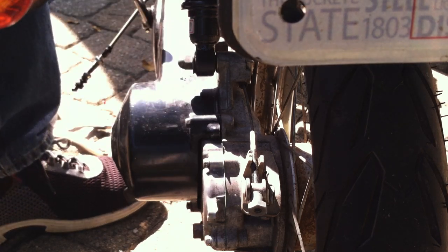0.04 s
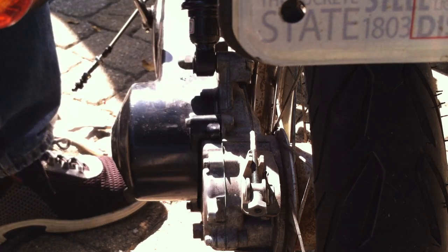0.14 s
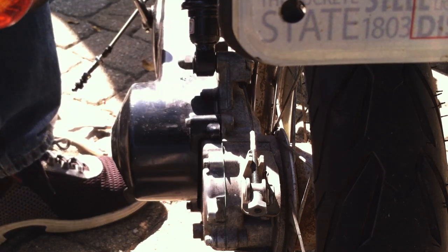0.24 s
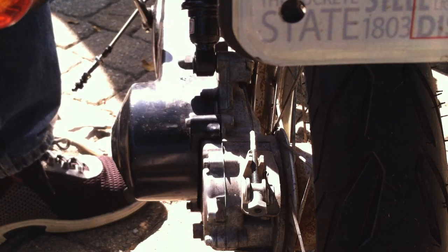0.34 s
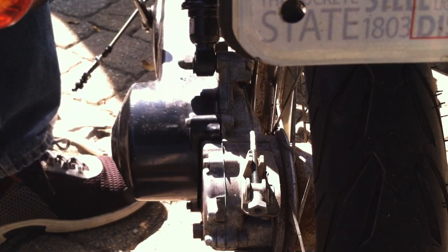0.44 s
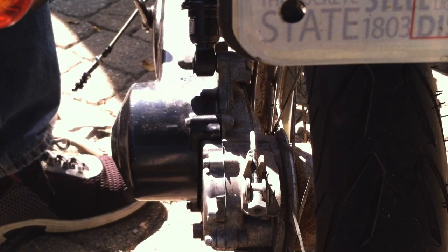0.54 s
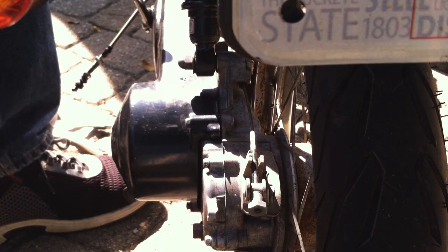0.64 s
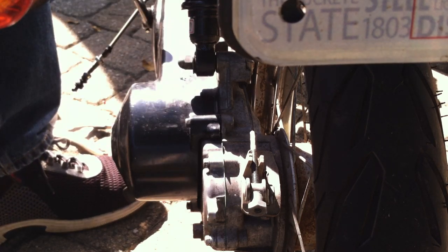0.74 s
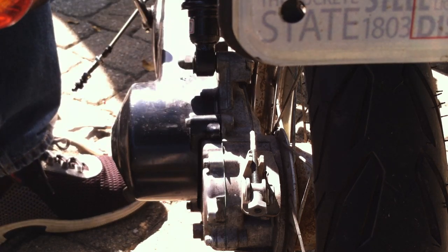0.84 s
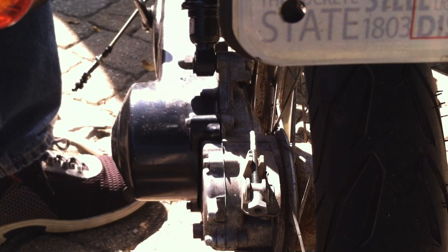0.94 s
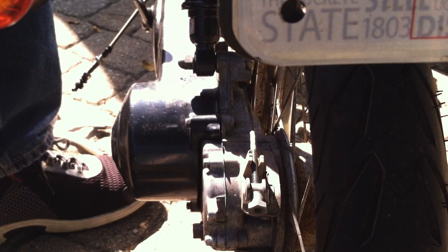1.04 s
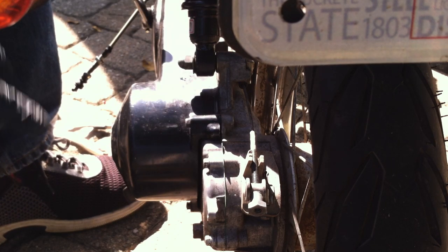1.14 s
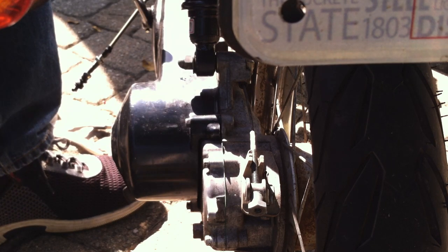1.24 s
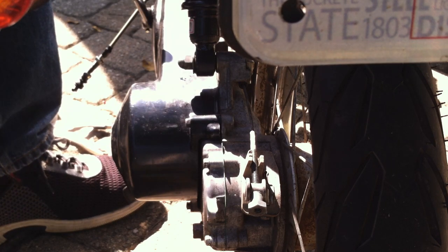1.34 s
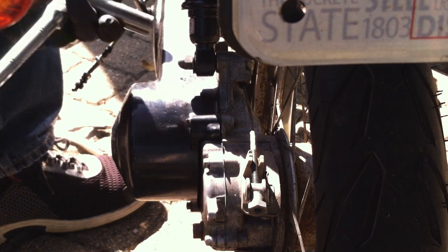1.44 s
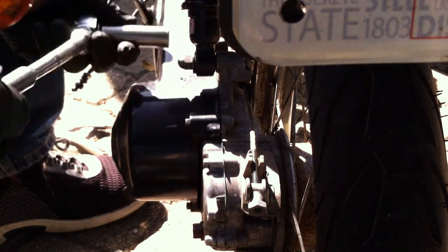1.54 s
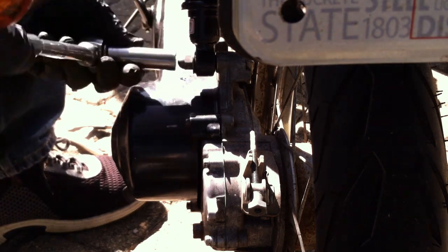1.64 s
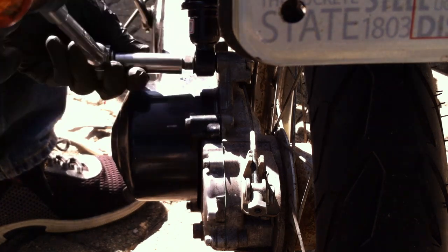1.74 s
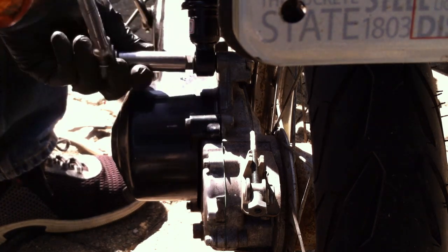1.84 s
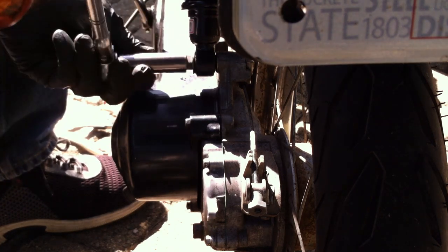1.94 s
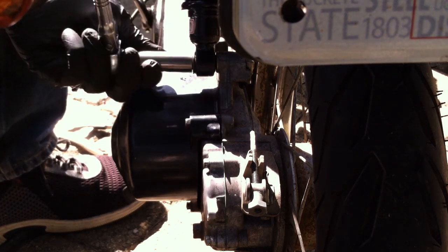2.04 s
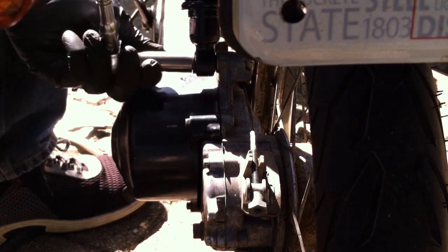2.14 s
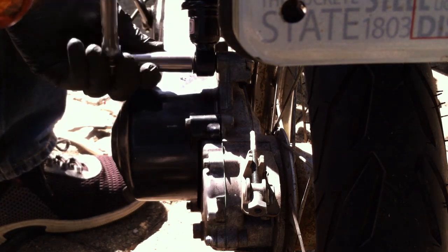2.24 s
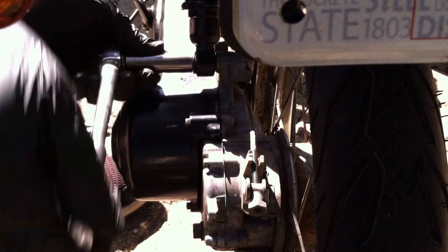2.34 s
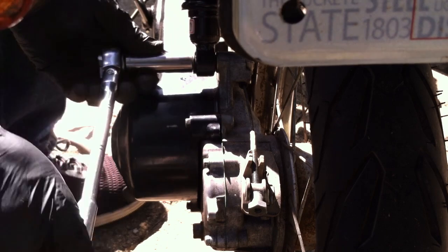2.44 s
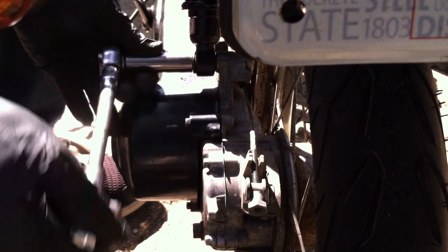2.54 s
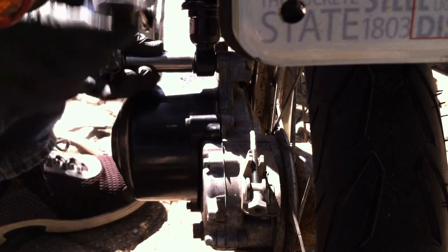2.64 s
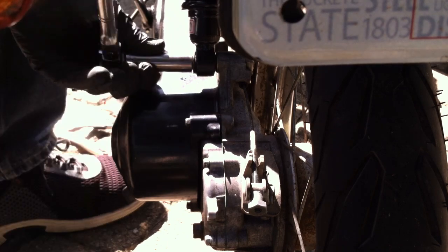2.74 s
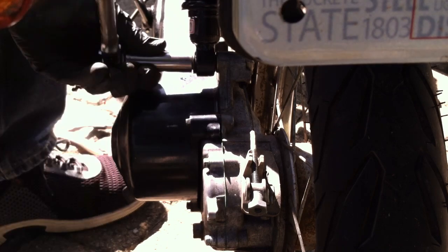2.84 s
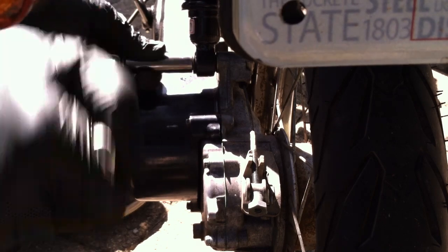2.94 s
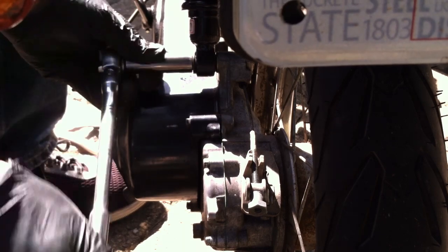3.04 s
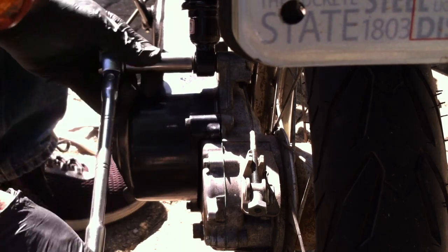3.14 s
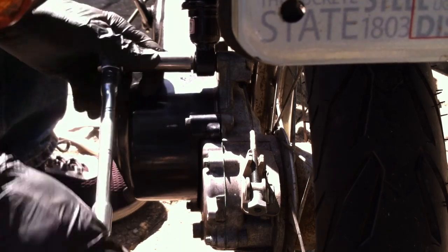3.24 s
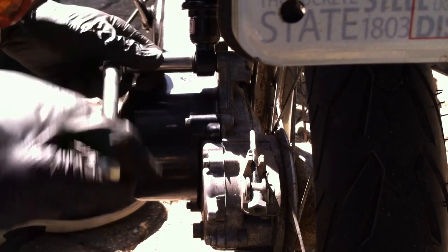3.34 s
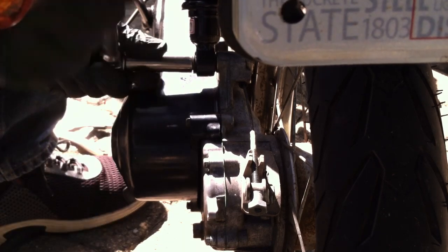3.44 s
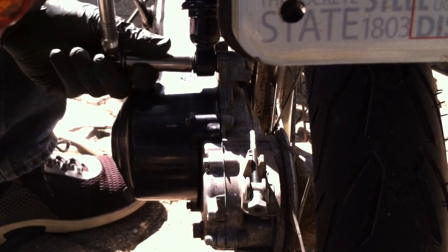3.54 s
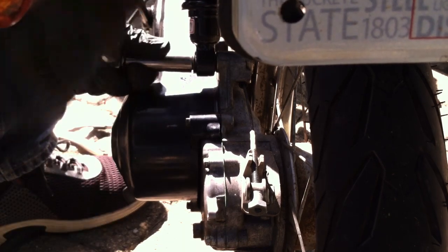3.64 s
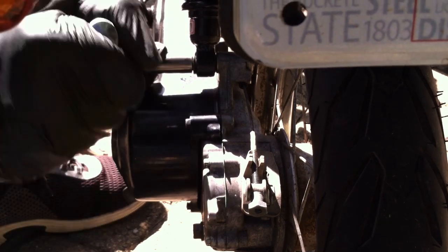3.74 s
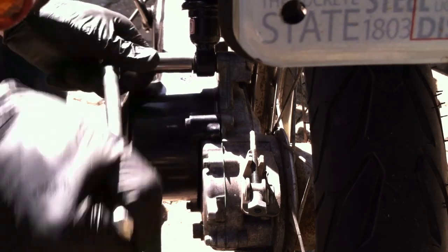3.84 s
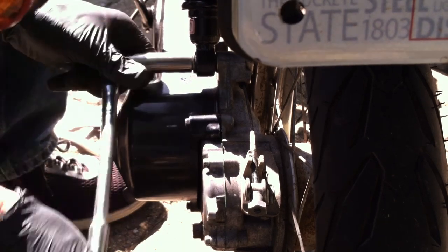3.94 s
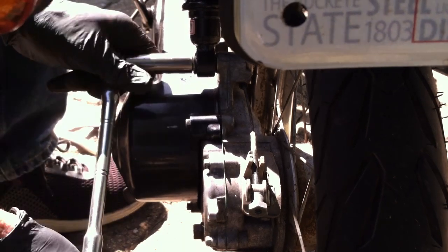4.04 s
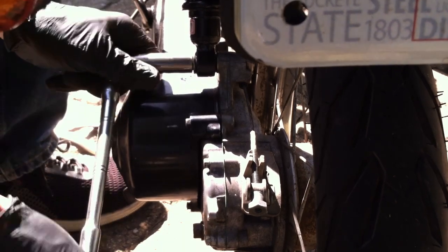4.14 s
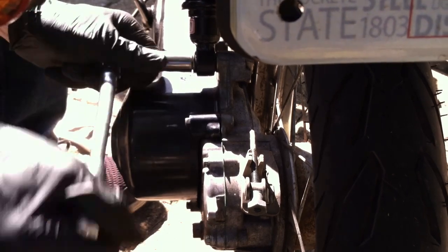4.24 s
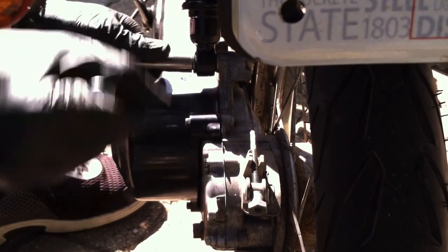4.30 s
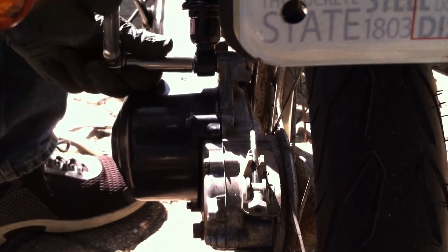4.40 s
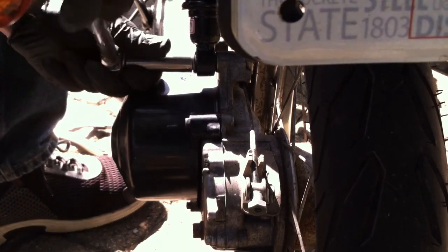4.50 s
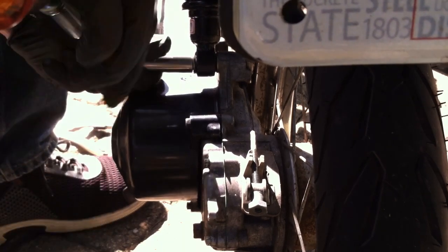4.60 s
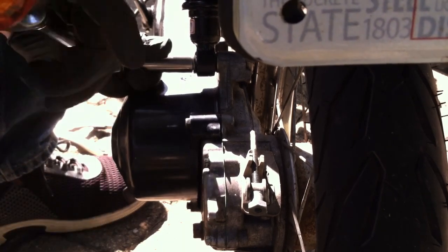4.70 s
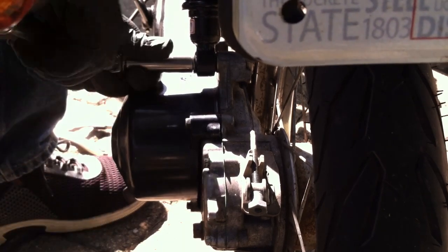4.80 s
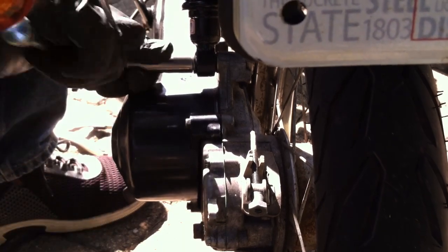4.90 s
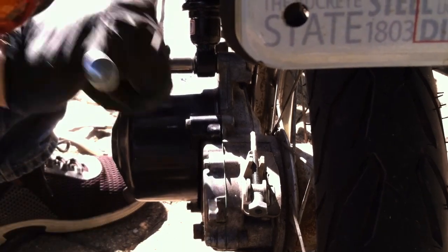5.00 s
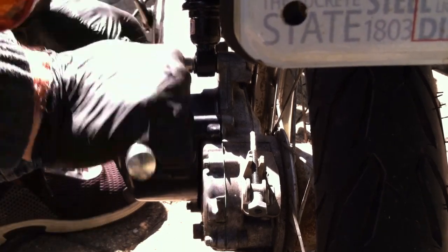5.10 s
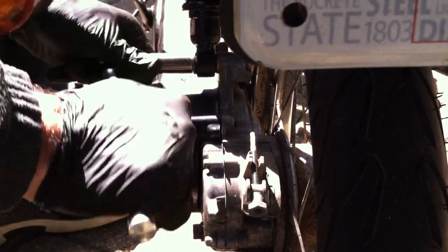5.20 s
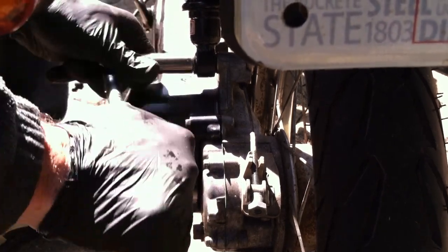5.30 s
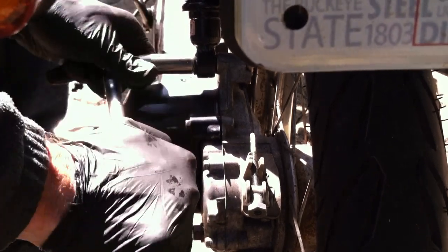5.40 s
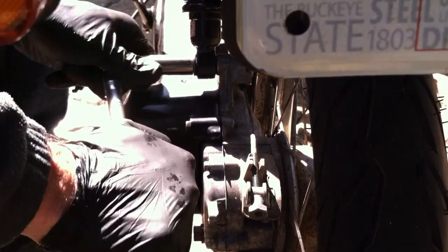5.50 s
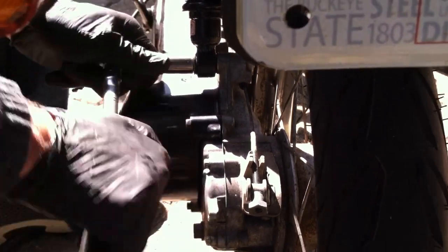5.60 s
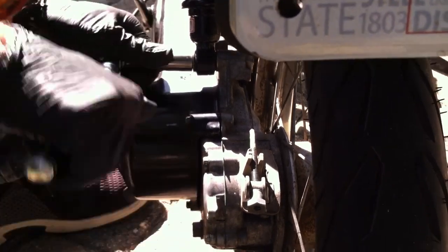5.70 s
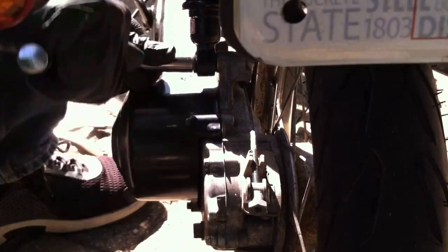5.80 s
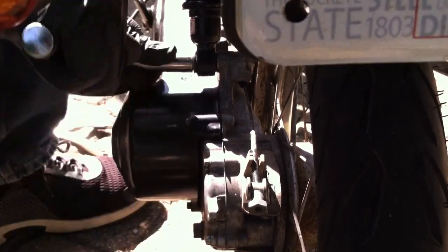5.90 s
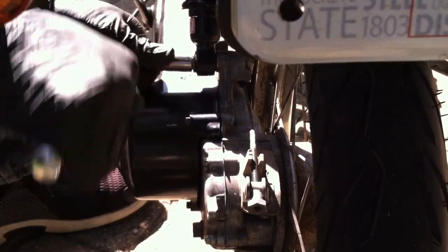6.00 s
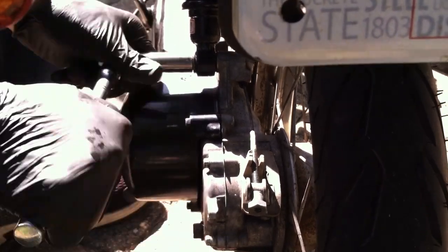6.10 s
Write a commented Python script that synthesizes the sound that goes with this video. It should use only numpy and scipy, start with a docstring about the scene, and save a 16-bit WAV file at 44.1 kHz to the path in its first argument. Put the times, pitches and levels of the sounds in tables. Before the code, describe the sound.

A ratchet wrench works a motorcycle bolt, heard close and in mono. Gloves rub softly and the socket knocks onto the bolt. The handle then swings back three times, each a quick run of crisp, ringing clicks with steel dragging on steel; the third also grinds briefly. A glove grips again with a faint squeak and one last tooth clicks. A quiet rush, hum and hiss lie underneath, with slight garage reflections.

```python
"""A ratchet wrench works a motorcycle bolt, close by and in mono, over a quiet rush, hum and hiss.
First the loose head ticks, gloves rub on the tool and, near 1.8 s, the socket knocks onto the bolt.
At about 2.7, 3.5 and 4.4 s the handle swings back: steel drags on steel and the pawl snaps over six
teeth, each impact ringing the head. The socket knocks as the load changes and grinds on the third swing.
Around 5.8 s the glove grips anew with a faint squeak, and one last tooth clicks."""
import sys
import numpy as np
from scipy import signal
from scipy.fft import rfft, next_fast_len
from scipy.io import wavfile

SR = 44100
rng = np.random.default_rng(int(sys.argv[2]) if len(sys.argv) > 2 else 0)


def materialize(psi):
    """Save the field psi as 16-bit PCM at rate SR to the path in sys.argv[1].

    A 1-D psi becomes a single channel; in a 2-D psi each row is a channel.
    """
    bounded = np.clip(np.atleast_2d(psi).T, -1, 1)
    quanta = np.round(bounded * 32767).astype(np.int16)
    wavfile.write(sys.argv[1], SR, quanta)


N = 271478
TIME = np.arange(N) / SR
HIT_TIME = TIME[:8192]   # time axis of one impact
CUTOFF_HZ = 16300
SLIP_S = .0012   # the pawl slides over a tooth's edge this long before it drops
# Edges in Hz of the bands among which a snap or a tick shares its energy.
CLICK_EDGES_HZ = [800, 2800, 5600, 8000, 11000, 16000]


def pawl():
    """Impact excitation: the pawl drops over each tooth, ringing the head and jolting the socket."""
    # Each row: start in seconds, level in dB, brightness in dB per octave, head resonance favoured
    # by the grip in Hz, free ring of the head in dB, pitch of the socket's clack in Hz, its lift in dB.
    teeth = [(2.725, -45.5, 0, 9900, -9, 5200, 0.5), (2.7455, -51.5, 0, 9850, -15, 5300, 5),
             (2.7665, -45.5, 0, 10000, -18, 5300, 1.5), (2.7902, -44.5, 4.5, 10000, -8, 3750, 4.5),
             (2.8189, -44, 1.5, 12400, -11, 6900, 4.5), (2.8621, -43, 0.5, 8000, -5.5, 2350, -2),
             (3.4562, -42, -3.5, 12100, -12, 1660, -10), (3.4859, -46, 0, 12400, -11, 5150, 0.5),
             (3.512, -48.5, -0.5, 5600, -9, 4030, 1), (3.5391, -49, -.7, 6900, -21, 3080, 2.5),
             (3.567, -45, 0.5, 6400, -26, 4020, 1), (3.603, -44.5, 0, 6460, -9, 5300, 1.5),
             (4.3774, -49.5, 1.5, 6500, -24, 4480, 4), (4.403, -48.5, 2.5, 6700, -14, 3900, 2),
             (4.427, -50, -1, 6700, -16, 5300, 4), (4.4518, -47, -0.5, 7040, -12, 5230, 0.5),
             (4.483, -43, 1, 6200, -14, 5200, -0.5), (4.5503, -44.5, 1.6, 13100, -17, 4630, -3),
             (5.8969, -49, -2.5, 8640, -14, 1580, 0.5)]
    # Relative level in dB of each click band.
    tooth_balance_db = [-5.5, -3, -3.5, -1, -0.5]
    # The head's after-ring. Each row: centre in Hz, width in Hz, relative level in dB, t60 in seconds.
    head_tail = [(9950, 380, -14, .07), (12440, 340, -3.5, .085), (13250, 600, -18, .07)]
    out = np.zeros(N)
    for s, db, brightness, favoured_hz, ring_db, clack_hz, lift_db in teeth:
        shared_db = balance(CLICK_EDGES_HZ, tooth_balance_db, 0, [clack_hz], lift_db)
        levels_db = db + balance(CLICK_EDGES_HZ, shared_db, brightness, [favoured_hz], 5.5, octaves=.39)
        head = peaked(snap(ring_db, crack_low_hz=4240), favoured_hz, db=6, width=.07)
        click = head + from_db(-18) * clack(clack_hz)
        add(out, s - SLIP_S, voiced(click, CLICK_EDGES_HZ, levels_db))
        tail_db = levels_db[-1] + 1.6 * ring_db   # the after-ring follows the free ring
        add(out, s, from_db(tail_db) * clusters(head_tail))
    return out


def snap(ring_db, crack_low_hz=1920):
    """Transient and free decay: a slip ends in a crack, then many damped modes and a few clear ones."""
    # Modes of the ratchet head. Each row: frequency in Hz, relative level in dB, t60 in seconds.
    head_modes = [(1580, -22, .03), (2350, -18, .015), (3800, -27, .014), (5240, -18, .02),
                  (6600, -14, .014), (7150, -18, .018), (8100, -18, .013), (9850, -10, .02),
                  (12380, -8, .017), (12850, -14, .016)]
    # Spectrum of a hard contact. Each row: frequency in Hz, gain in dB.
    hard_colour = [(150, -8), (450, -6.5), (1500, 2), (4500, 2.5), (7000, -1), (12700, 12), (13600, 4),
                   (15000, -6), (16500, -27)]
    crack, steel = rng.standard_normal((2, len(HIT_TIME)))
    high_pass = signal.butter(2, crack_low_hz, "high", fs=SR, output="sos")
    crack = signal.sosfilt(high_pass, crack * dying(t60=.0046))
    dense_ring = from_db(-13) * steel * dying(t60=.021)
    clear_ring = from_db(ring_db) * ringing(head_modes, spread_db=7, detune=.0088)
    drop = crack + dense_ring + clear_ring
    size = int(SLIP_S * SR)
    slip = from_db(np.linspace(-27, -7, size)) * band(rng.standard_normal(size), crack_low_hz, CUTOFF_HZ)
    return coloured(np.concatenate([slip, drop])[:len(drop)], hard_colour)


def clack(hz, delay_s=.0016):
    """Backlash: just after a tooth, the socket jumps in its play with a rattle and a few damped modes."""
    # Each row: frequency in Hz, relative level in dB, t60 in seconds.
    clack_modes = [(1633, 0, 0.017), (2090, -2, .016), (2400, -4, 0.0095), (3010, -3.5, .012),
                   (3750, -4, .013), (4580, -10, .015), (5240, -7.5, .014)]
    rattle = from_db(.5) * rms_one(band(rng.standard_normal(len(HIT_TIME)), 800, 5600)) * dying(t60=.026)
    modes = ringing(clack_modes, spread_db=4, detune=.035)
    sound = peaked(rattle + modes, hz, db=6.5, width=.21)
    return np.pad(sound, (int(delay_s * SR), 0))[:len(sound)]


def socket(contacts=5):
    """Contact chatter: rapid impacts ring the socket as it takes up its play, and the bolt rings on."""
    # Each row: start in seconds, chatter length in seconds, level in dB, brightness in dB per octave,
    # ring of the bolt in dB, lift in dB of two resonances the contact point favours, those two in Hz.
    knocks = [(1.78, 0.0051, -49.5, 1.1, -1, 8, 1630, 3050), (1.86, 0.0048, -62.5, -1, 4, 5.5, 2300, 3070),
              (1.9052, 0.0053, -54, 0.5, -11, 7.7, 1980, 2510),
              (1.9105, 0.0048, -49, 0.5, -4, 8.2, 1140, 2230), (2.07, .0057, -59.5, 0, -3, 6.5, 1580, 3080),
              (2.1304, 0.0042, -60, -4, -10, 7, 1380, 1940), (2.139, 0.0042, -63, -4.5, -3, 4.4, 613, 1040),
              (2.294, .012, -68.5, -3.5, -6, 3.2, 1500, 2200), (2.331, .012, -60.5, -0.5, -8, 5, 680, 1630),
              (2.676, 0.0059, -61, 0, -13, 5.7, 600, 1460),
              (2.704, 0.0081, -64, -2.5, -13, 5.5, 1460, 3050),
              (2.96, 0.0064, -67, -1.5, -11, 5, 1100, 2200), (3.406, 0.0042, -66.5, 2, -9, 5.6, 1160, 1640),
              (3.459, .00193, -52.5, 2, -9, 7.2, 1520, 1790),
              (3.462, .004, -58.5, 4.5, -9, 8.5, 1640, 4300),
              (3.76, .0048, -62.5, 7.5, -9, 2.1, 1700, 4100), (3.769, 0.003, -59, 0.5, -10, 5.7, 680, 1920),
              (4.2847, 0.0022, -49.5, 0.5, -2.5, 14, 1330, 3780),
              (4.63, 0.0056, -64, 5.5, -10, 6.5, 520, 2210),
              (5.817, 0.0032, -65.5, 2.5, -6, 4.6, 1160, 3400),
              (5.8218, 0.0058, -60.5, 3, -9, 6.6, 1660, 3340)]
    # Socket and extension. Each row: frequency in Hz, relative level in dB, t60 in seconds.
    socket_modes = [(522, -19, .05), (629, -16, .04), (1037, -8, .025), (1165, -4, .025),
                    (1463, -4.5, .022), (1617, -5, .018), (1770, -3.5, .016), (2172, -3.5, .015),
                    (2330, -9, .016), (2530, -9, .015), (3060, -2, .016), (3480, -3, .02), (3750, -3, .011),
                    (4030, -5, .015), (4550, -10, .018), (7820, -3.5, .0095)]
    # Bolt and bracket. Each row: cluster centre in Hz, width in Hz, relative level in dB, t60 in seconds.
    bolt_modes = [(523, 115, -2.5, 0.18), (1142, 170, 3, 0.11), (1460, 420, -1, 0.1), (1840, 260, -2, 0.1),
                  (2340, 330, -3, .11), (3040, 450, -4, .115), (3410, 310, -4.5, .15),
                  (3970, 500, -10, .06)]
    # Spectrum of a blunt contact. Each row: frequency in Hz, gain in dB.
    blunt_colour = [(120, -28), (350, -13.5), (520, -5.5), (1500, 0), (4200, 12), (5500, 4.5),
                    (11000, -16.5), (13000, -29), (16000, -39)]
    # Band edges of a knock in Hz, and the relative level of each band in dB.
    edges_hz = [350, 900, 1350, 2000, 2800, 5000, 14000]
    knock_balance_db = [0, -0.5, 1, -1, -1.6, -5.5]
    out = np.zeros(N)
    for s, chatter_s, db, brightness, ring_db, favour_db, *favoured in knocks:
        knock = np.zeros(len(HIT_TIME))
        for k in range(contacts):
            delay = int(chatter_s * SR * k / contacts * rng.uniform(.8, 1.2))
            clear_ring = ringing(socket_modes, spread_db=2.5, detune=.0061)
            dense_ring = rng.standard_normal(len(knock)) * dying(t60=.034)
            knock[delay:] += (clear_ring + dense_ring)[:len(knock) - delay]
        for hz in favoured:
            knock = peaked(knock, hz, db=.63 * favour_db, width=.21)
        levels_db = db + balance(edges_hz, knock_balance_db, brightness, favoured, favour_db, octaves=.49)
        add(out, s, voiced(coloured(knock, blunt_colour), edges_hz, levels_db))
        add(out, s + chatter_s, from_db(db + ring_db) * clusters(bolt_modes))
    return out


def ticks():
    """Backlash: the play in the loose ratchet head closes with light impacts."""
    # Each row: start in seconds, level in dB, brightness in dB per octave.
    impacts = [(0.7187, -71, 3), (.755, -72.5, 1), (2.3147, -72.5, -9), (2.336, -66.5, 4), (2.622, -73, -1),
               (2.6472, -71, 0), (2.6676, -73, -3), (2.693, -67.5, -3), (2.7222, -59, -2),
               (2.935, -69.5, 1), (2.958, -69, -1), (2.9811, -62, -5.5), (3.34, -74.5, -7), (3.562, -68, 4),
               (3.595, -74, 3), (4.286, -59.5, 1), (4.348, -70, -6), (4.372, -63, 9), (4.614, -71, 4),
               (5.017, -75.5, -4), (5.0602, -70, -1), (5.859, -69.5, -4)]
    # Relative level in dB of each click band.
    tick_balance_db = [-2.5, 2, 7, 2.5, -7.5]
    out = np.zeros(N)
    for s, db, brightness in impacts:
        levels_db = db + balance(CLICK_EDGES_HZ, tick_balance_db, brightness)
        add(out, s - SLIP_S, voiced(snap(ring_db=-15), CLICK_EDGES_HZ, levels_db))
    return out


def ringing(modes, spread_db, detune):
    """Modal superposition: damped sines, with strength and pitch varied a little from blow to blow."""
    out = 0
    for hz, db, t60 in modes:
        strength = from_db(db + spread_db * rng.standard_normal()) * rng.choice([-1, 1])
        pitch = hz * (1 + detune * rng.standard_normal())
        out = out + strength * dying(t60) * np.sin(2 * np.pi * pitch * HIT_TIME)
    return out


def clusters(modes):
    """Beating: close modes interfere in a grainy after-ring, modelled as decaying bands of noise."""
    size = len(HIT_TIME)
    out = 0
    for hz, width_hz, db, t60 in modes:
        beating = band(rng.standard_normal(2 * size), hz - width_hz / 2, hz + width_hz / 2)[-size:]
        out = out + from_db(db) * rms_one(beating) * dying(t60)
    return out


def balance(edges, shared_db, brightness, favoured=(), favour_db=0, octaves=1):
    """Spectral envelope: band levels in dB, tilted by contact hardness, lifted at favoured resonances."""
    pitch = np.log2(np.multiply(edges[:-1], edges[1:])) / 2
    lift = sum(np.exp(-((pitch - np.log2(hz)) / octaves) ** 2) for hz in favoured)
    return np.asarray(shared_db) + brightness * (pitch - np.median(pitch)) + favour_db * lift


def voiced(hit, edges, levels_db):
    """Equalisation: each band of a blow is brought towards its given rms level over the first 12 ms."""
    first = int(.012 * SR)
    hz = np.fft.rfftfreq(4 * first, 1 / SR)
    centres = np.sqrt(np.multiply(edges[:-1], edges[1:]))
    for _ in range(2):   # neighbouring bands overlap, so the balance settles in two passes
        power = np.abs(rfft(hit[:first], 4 * first)) ** 2 / (2 * first ** 2)
        band_power = [power[(hz >= low) & (hz < high)].sum() for low, high in zip(edges, edges[1:])]
        now_db = 10 * np.log10(np.add(band_power, 1e-20))
        hit = coloured(hit, np.column_stack([centres, levels_db - now_db]))
    return hit


def grind(half_width_hz=210):
    """Friction-driven resonance: the dry socket's rough pitch rises and falls with the handle's speed."""
    # Each row: time in seconds, pitch in Hz, level in dB.
    glide = [(4.335, 1450, -75), (4.358, 1518, -60), (4.39, 1682, -61), (4.412, 1660, -57),
             (4.44, 2050, -56), (4.456, 1527, -58), (4.475, 1148, -56), (4.5, 1100, -75)]
    s, hz, db = np.transpose(glide)
    low_pass = signal.butter(2, half_width_hz, fs=SR, output="sos")
    rough = rms_one(signal.sosfilt(low_pass, rng.standard_normal((2, N))))
    phase = 2 * np.pi * np.cumsum(np.interp(TIME, s, hz)) / SR
    envelope = np.interp(TIME, s, from_db(db), left=0, right=0)
    return envelope * (rough[0] * np.cos(phase) + rough[1] * np.sin(phase))


def squeaks():
    """Stick-slip: turning steel and the rubber glove squeak briefly around one unsteady pitch; the first, very
    short row is instead the ring a light tick leaves near 5.1 kHz."""
    # Each row: start in seconds, length in seconds, pitch in Hz, bandwidth in Hz, level in dB.
    slips = [(2.642, 0.012, 5130, 260, -55), (4.663, .1, 7100, 300, -70.5), (5.751, .24, 716, 140, -62)]
    out = np.zeros(N)
    for s, length_s, hz, width_hz, db in slips:
        size = int(length_s * SR)
        tone = rms_one(band(rng.standard_normal(SR // 2), hz - width_hz / 2, hz + width_hz / 2)[-size:])
        add(out, s, from_db(db) * tone * np.sqrt(np.hanning(size)))
    return out


def steel_drag():
    """Sliding friction: steel drags on steel as the handle swings."""
    # Each row: fastest moment in seconds, length in seconds, level in dB.
    drags = [(2.75, 0.15, -51), (2.965, 0.047, -56), (3.35, 0.071, -72), (3.49, 0.08, -56.5),
             (4.42, 0.17, -60)]
    # Each row: frequency in Hz, relative spectral level in dB.
    drag_colour = [(80, -38), (250, -13), (520, 6.5), (900, 1), (1600, 4.5), (2200, -0.5), (3000, -1),
                   (5200, -10), (9000, -55), (13000, -33), (16000, -35)]
    return friction(drags, drag_colour, grains_per_s=570, grain_share=.41)


def gloves():
    """Sliding friction: gloves and sleeve brush along brightly; a fresh grip rubs lower in pitch."""
    # Hand movements. Each row: fastest moment in seconds, length in seconds, level in dB.
    slides = [(1.35, 0.16, -63), (1.62, .14, -70.5), (2.33, .1, -69), (3.79, 0.1, -68), (4.352, 0.017, -70),
              (4.62, 0.23, -65), (4.86, .06, -70.5), (4.97, 0.24, -67.5), (5.062, 0.02, -62),
              (5.152, .025, -68), (5.78, 0.25, -67), (6.12, .15, -70)]
    grips = [(5.78, 0.08, -55), (5.93, 0.24, -64.5)]
    # Their spectra. Each row: frequency in Hz, relative level in dB.
    slide_colour = [(800, -20), (2500, -5.5), (5000, -2.5), (9000, -7.5), (12000, -13.5), (16000, -31)]
    grip_colour = [(60, -53), (250, -14), (430, 0), (780, 6), (1000, -7), (1600, -10), (4000, -20),
                   (9000, -47)]
    sliding = friction(slides, slide_colour, grains_per_s=1100, grain_share=.21)
    gripping = friction(grips, grip_colour, grains_per_s=430, grain_share=.37)
    return sliding + gripping


def friction(strokes, colour, grains_per_s, grain_share, catch_db=3.5, catches_per_s=160):
    """Friction noise: tiny slips on a hiss catch unevenly and swell in a bell curve with each stroke."""
    slips = (rng.random(N) < grains_per_s / SR) * rng.standard_normal(N)
    force = np.sqrt(grain_share) * rms_one(slips) + np.sqrt(1 - grain_share) * rng.standard_normal(N)
    moments = np.arange(0, N / SR, 1 / catches_per_s)
    catches_db = catch_db * np.clip(rng.standard_normal(len(moments)), -2, 2)
    catching = level(np.column_stack([moments, catches_db]))
    swell = sum(from_db(db) * .5 ** ((2 * (TIME - s) / length_s) ** 2) for s, length_s, db in strokes)
    return swell * rms_one(coloured(force * catching, colour))


def garage(x, first_echo_s=.0025):
    """Reverberation: weak diffuse reflections from machine, floor and walls; the treble dies first."""
    # Each row: frequency in Hz, t60 in seconds.
    room_t60 = [(300, .3), (2000, .28), (6000, .16), (13000, .12)]
    # Each row: frequency in Hz, level of the reflections in dB.
    room_level = [(300, -14), (1500, -16), (2300, -18.5), (3800, -20), (6000, -24), (13000, -29)]
    t = TIME[:SR // 2]
    edges = np.geomspace(200, 16000, 8)
    response = 0
    for low, high in zip(edges, edges[1:]):
        hz = np.sqrt(low * high)
        envelope = dying(at_hz(room_t60, hz), t) * (t > first_echo_s)
        echoes = band(rng.standard_normal(len(t)) * envelope, low, high) / np.linalg.norm(envelope)
        response = response + from_db(at_hz(room_level, hz)) * echoes
    return signal.fftconvolve(x, response)[:N]


def background():
    """Noise floor: a low outdoor rush and resonant microphone hiss swell slightly over a steady hum."""
    # Spectra of rush and hiss. Each row: frequency in Hz, relative level in dB.
    air_colour = [(15, -69), (25, -25), (53, -27), (86, -11.5), (140, -0.5), (176, -2), (242, -2.5),
                  (278, -4), (304, -5), (383, -9), (592, -9), (649, -10), (1070, -8.5), (1620, -15),
                  (6000, -24), (7800, -40), (13200, -120)]
    hiss_colour = [(4500, -54), (6000, -6), (7200, -3.5), (8000, 4.5), (8500, -1), (9300, -7.5),
                   (11000, -12), (13000, -19), (16000, -28.5)]
    # Each row: frequency in Hz, rms level in dB.
    hum_tones = [(100, -80), (150.5, -100), (300, -74.5)]
    # Each row: time in seconds, gain in dB.
    swell = [(0, -1), (.6, -1.3), (1.3, 0.08), (6.15, 0.22)]
    air = from_db(-58) * rms_one(coloured(rng.standard_normal(N), air_colour))
    hiss = from_db(-70) * rms_one(coloured(rng.standard_normal(N), hiss_colour))
    hum = sum(from_db(db) * np.sqrt(2) * np.sin(2 * np.pi * (hz * TIME + rng.random()))
              for hz, db in hum_tones)
    return level(swell) * (air + hiss) + hum


def coloured(x, points):
    """Minimum-phase filter, hence causal, shaped by rows of frequency in Hz and gain in dB."""
    size = next_fast_len(len(x))
    log_gain = np.log(from_db(at_hz(points, np.abs(np.fft.fftfreq(size, 1 / SR)))))
    response = np.exp(np.conj(signal.hilbert(log_gain)))
    return np.fft.ifft(np.fft.fft(x, size) * response).real[:len(x)]


def peaked(x, hz, db, width):
    """Resonance: a narrow lift whose width on each side is a share of its frequency."""
    return coloured(x, [(hz * (1 - width), 0), (hz, db), (hz * (1 + width), 0)])


def band(x, low, high):
    """Band-pass filter with edges in Hz."""
    return signal.sosfilt(signal.butter(4, [low, high], "band", fs=SR, output="sos"), x)


def dying(t60, t=HIT_TIME):
    """Exponential decay by 60 dB in t60 seconds."""
    return np.exp(-np.log(1000) * t / t60)


def at_hz(points, hz):
    """Interpolation on a log-frequency axis."""
    known_hz, values = np.transpose(points)
    return np.interp(np.log(np.maximum(hz, 1)), np.log(known_hz), values)


def level(rows):
    """Amplitude envelope from rows of time in seconds and gain in dB."""
    return from_db(np.interp(TIME, *np.transpose(rows)))


def from_db(db):
    """Decibels to amplitude ratio."""
    return 10 ** (np.asarray(db) / 20)


def rms_one(x):
    """Normalisation to unit rms."""
    return x / np.sqrt(np.mean(x ** 2) + 1e-20)


def add(track, s, sound):
    """Superposition of a sound starting at s seconds."""
    start = int(round(s * SR))
    track[start:start + len(sound)] += sound[:N - start]


def scene():
    """Superposition: tool, reflections, hands and background add, the same in both channels."""
    tool = pawl() + ticks() + socket() + grind() + squeaks() + steel_drag()
    hands = gloves()
    mono = tool + garage(tool) + hands + background()
    return np.stack([mono, mono])


def record(dry):
    """Band limiting: a steep elliptic low-pass removes the highest treble."""
    return signal.sosfilt(signal.ellip(10, .1, 70, CUTOFF_HZ, fs=SR, output="sos"), dry)


dry = scene()
out = record(dry)
materialize(out)
```